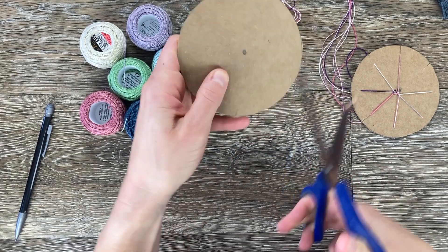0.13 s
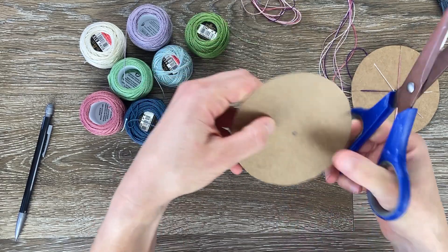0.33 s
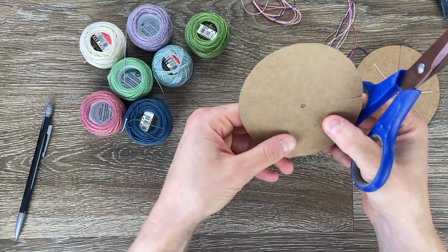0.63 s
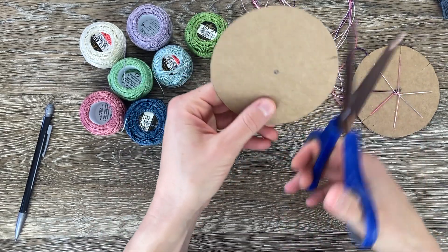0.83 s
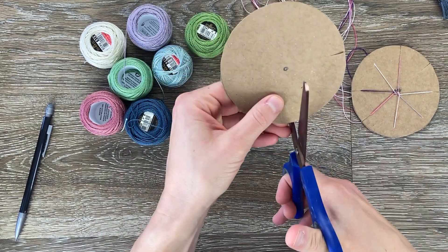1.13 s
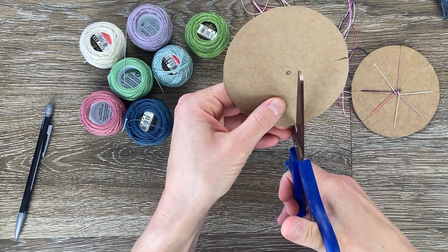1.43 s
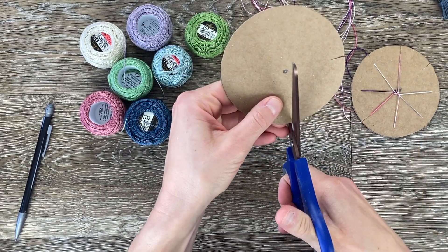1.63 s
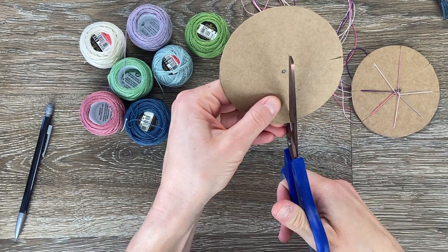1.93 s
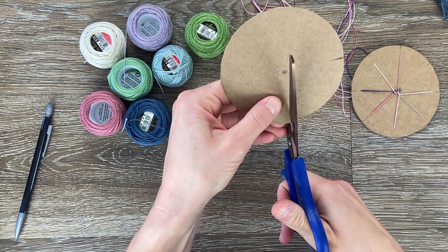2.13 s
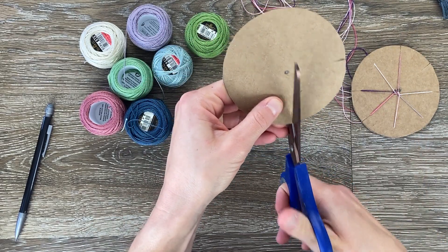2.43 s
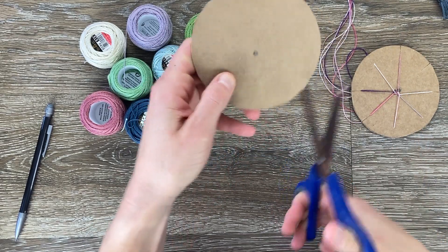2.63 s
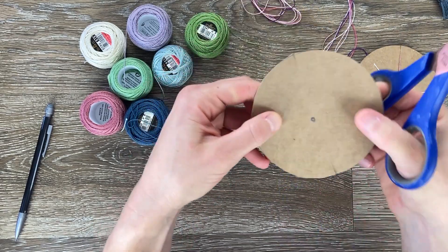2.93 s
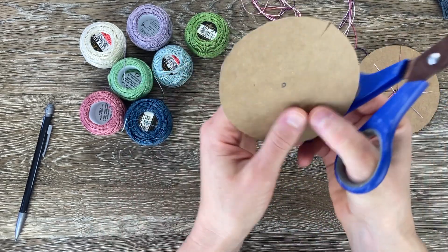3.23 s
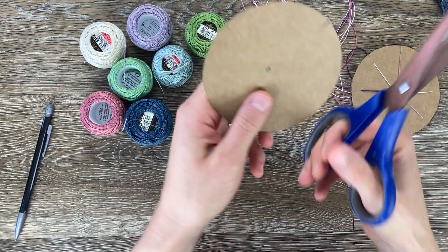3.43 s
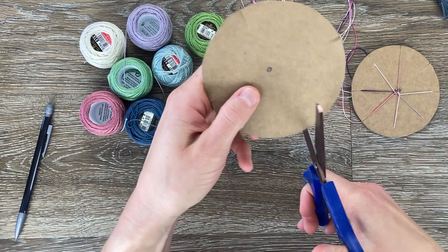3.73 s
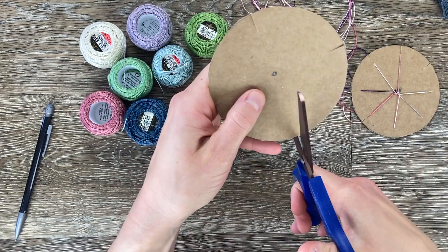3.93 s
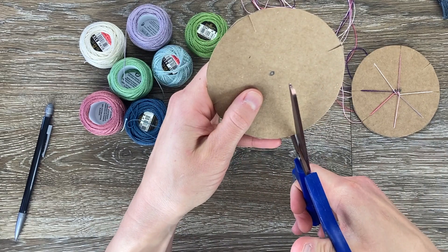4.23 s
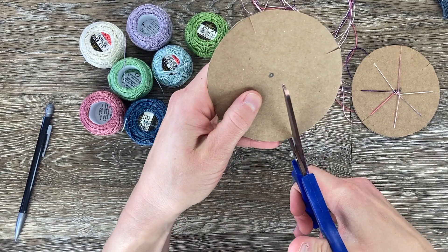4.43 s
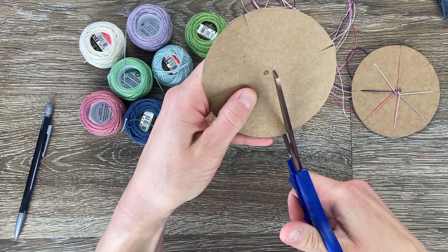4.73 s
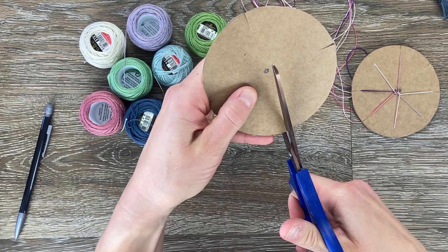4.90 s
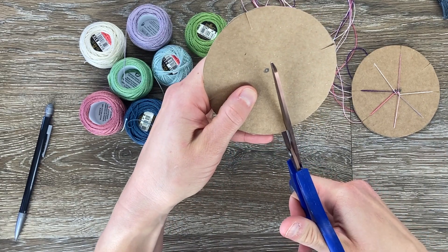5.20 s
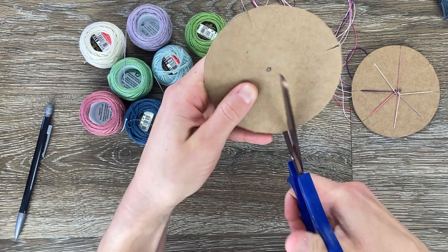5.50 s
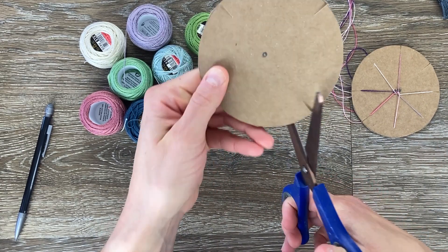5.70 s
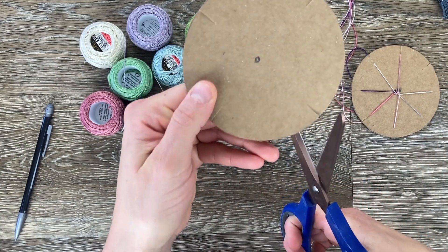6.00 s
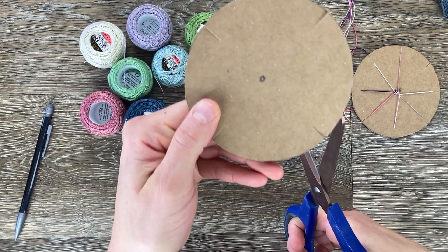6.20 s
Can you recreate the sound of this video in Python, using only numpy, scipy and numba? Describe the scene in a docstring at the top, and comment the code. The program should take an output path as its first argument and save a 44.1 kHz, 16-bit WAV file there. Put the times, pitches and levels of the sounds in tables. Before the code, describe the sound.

Fingers tap and rub a small cardboard disc close to the microphone. Scissors then crunch slowly through the card in uneven little bursts. More taps and dry scrapes follow as the disc is turned, then comes a second slow cut and a last, louder cluster of handling. The small room is quiet, with a faint hum and far-off traffic.

```python
"""Scissors make two slow cuts into a small cardboard disc, close by, over a wooden table.
By stick and slip the fibres tear in bursts, which excite the resonances of blades and card.
Between cuts, fingers and blades slide over the disc and tap it, and the table top rings faintly.
Behind this a small room hums, traffic murmurs far off, and slow air pressure rocks the microphone."""
import sys
import numpy as np
from scipy import signal
from scipy.fft import rfft, irfft, next_fast_len
from scipy.io import wavfile
from scipy.ndimage import uniform_filter1d
from numba import njit

SR = 44100
rng = np.random.default_rng(int(sys.argv[2]) if len(sys.argv) > 2 else 0)


def wav_out(sig):
    """Save sig, one row per channel (or a flat mono array), as 16-bit PCM at SR to the path in sys.argv[1]."""
    wavfile.write(sys.argv[1], SR, np.round(np.clip(np.atleast_2d(sig).T, -1, 1) * 32767).astype(np.int16))


N = 280299

# Steady tearing, one table for each cut: time_s, level_db
CUTS = [
    [(1.58, -93), (1.586, -77), (1.7, -55.5), (1.83, -58.5), (2.068, -58), (2.106, -66), (2.27, -68.5),
     (2.314, -56), (2.42, -89)],
    [(4.52, -75), (4.63, -53.5), (4.7, -57), (4.882, -69), (4.93, -58.5), (4.976, -72), (5.25, -71.5),
     (5.266, -55), (5.33, -85), (5.44, -100)],
]
# Lumps of fibre giving way: start_s, level_db
SLIPS = [(1.749, -55), (1.813, -61), (1.843, -50.5), (1.894, -56), (2.022, -54), (2.047, -60), (2.114, -59),
         (2.139, -54), (2.163, -52), (2.184, -47.5), (2.278, -50), (2.306, -49), (2.3225, -49),
         (2.348, -53), (2.372, -57), (4.574, -57), (4.6114, -56), (4.661, -51.5), (4.7244, -51),
         (4.778, -56.5), (4.8003, -52), (4.819, -53), (4.866, -54), (4.8937, -52), (4.9294, -64.5),
         (4.983, -52.5), (5.051, -60), (5.0913, -50.5), (5.12, -56), (5.133, -53), (5.1612, -68),
         (5.212, -54.5), (5.2632, -51), (5.292, -53), (5.3344, -51.5), (5.384, -53.5)]
# Modes of the blades gripping the card, with mid-cut gain and its change as the bite moves to the tips:
# pitch_hz, width_hz, first_gain_db, first_change_db, second_gain_db, second_change_db
BLADE_MODES = [(460, 23, -27, 3, -2, -21), (614, 138, -6, -3, -5.5, -1), (1148, 85, -5, -1.5, -8.5, 4),
               (1494, 205, -8, -9, -8, -2), (1786, 165, -3, 9, -5, 0), (2090, 236, -8.5, 1, -2, -1),
               (2330, 204, 1.5, 1.5, -3, 3), (2595, 190, -2, 7, -4, -6), (2910, 470, -14, -13, -5.5, -3),
               (3440, 250, -9.5, 3, -8.5, -2), (4280, 410, -10, -4, -6, -1.5),
               (5020, 460, -12.5, -3, -9.5, -1), (5990, 560, -7, -6, -9, 0),
               (6590, 540, -7.5, 3.5, -8.5, 3), (7120, 710, -14.5, 2, -15.5, -1),
               (8550, 700, -15.5, 5, -14.5, 4), (9450, 940, -17.5, -4, -18, 4),
               (11300, 1800, -23.5, 10, -25, 3), (13400, 2500, -21.5, 3, -20, 0),
               (15000, 1900, -28, -4, -22, 4)]
# Rise of the low modes through a cut, one value for each cut: rise_fraction
MODE_RISE = [0.094, 0.029]
# Strokes of skin and steel on the disc; flex, hiss, sheen and scrape are relative to the level:
# start_s, swell_s, hold_s, fade_s, level_db, flex_db, hiss_db, sheen_db, scrape_db, scrape_hz
SLIDES = [(0.0, .004, 0.0095, 0.037, -61, 6, -7, -15, 1.5, 4460),
          (0.03, 0.027, .11, .06, -70, 1, -18, -22, -3.5, 4700),
          (0.185, 0.021, 0.019, 0.028, -62, 0.5, -14, -22, -6, 4500),
          (0.21, 0.057, 0.11, 0.13, -66.5, -4, -12.5, -16, -5, 4700),
          (0.43, 0.0058, .004, 0.034, -62, 1.5, -8, -14, -13, 4220),
          (0.44, .01, 0.091, .08, -87, 20, -20, -22, -22, 4370),
          (0.66, 0.0045, 0.0093, 0.033, -69, 14.5, -18, -28, -13, 4020),
          (0.68, 0.034, .015, 0.027, -68, -9, -5.5, -4, -1.5, 4300),
          (0.764, 0.0053, .04, 0.15, -72.5, 3.5, -10, -14, -15, 4700),
          (1.066, 0.01, .002, .017, -68, -15, -5, -14, -5, 4590),
          (1.09, 0.038, 0.0055, 0.072, -71.5, 12.5, -14, -18, -3, 3940),
          (2.445, 0.012, 0.051, 0.025, -58.5, 1.5, -13.5, -12, -3, 4540),
          (2.516, 0.003, .005, 0.082, -58, 8, -9.5, -15, -1.5, 4450),
          (2.58, 0.077, .002, 0.044, -58.5, -12, -12, -16, 0.5, 4800),
          (2.69, 0.078, 0.0023, .008, -60, -1, -13, -21, -1, 4670),
          (2.91, 0.079, 0.0054, .02, -64, 2.5, -16, -19, -5, 4600),
          (3.004, 0.0077, .002, 0.054, -56, 2.5, -7, -11, -2, 4690),
          (3.05, 0.036, 0.057, .025, -70.5, -7, -14, -9, -6, 4570),
          (3.25, 0.0047, .002, 0.014, -55, 5, -7, -20, -7, 4250),
          (3.256, 0.0057, 0.025, 0.11, -61.5, -9, 0, 0.5, 2, 4300),
          (3.29, 0.06, 0.034, 0.036, -59, -5, -14, -13, -5, 4200),
          (3.388, 0.0068, .002, 0.038, -57.5, 9.5, -17, -23, -0.5, 4030),
          (3.425, .03, 0.031, 0.15, -59, -4, -11, -9, -2, 4270),
          (3.673, 0.0058, .002, 0.076, -49, -4, -15.5, -19, -4, 4180),
          (3.77, .022, .002, 0.06, -70, 1, -14, -14, -8, 4500),
          (3.929, 0.0053, .002, 0.044, -60, 7, -29, -33, -11, 4200),
          (5.497, 0.019, .003, 0.064, -53.5, 5.5, -20, -19, -3.5, 4360),
          (5.53, 0.027, 0.033, 0.03, -57.5, -8, -16, -17, 1, 4430),
          (5.59, 0.033, 0.076, .015, -59.5, -12, -6, -5, -0.5, 4380),
          (5.704, .006, .002, 0.088, -54, -2.5, -20, -14, -12, 4600),
          (5.751, 0.0048, .001, 0.017, -45.5, 11, -27, -24, -11, 5300),
          (5.758, .006, .002, 0.11, -55, 3, -17, -22, -13, 5230),
          (5.825, 0.011, 0.019, 0.028, -53.5, -2, -18, -18, -14, 4400),
          (5.85, .018, 0.028, 0.017, -40, -3.5, -23, -17, -9, 4020),
          (5.895, 0.0062, .004, 0.095, -56.5, 1.5, -12, -21, -4.5, 4360)]
# Taps on the disc, whose grip sets what rings; body and table are relative to the level:
# start_s, level_db, body_db, body_hz, face_hz, table_db
TAPS = [(0.0133, -38, 1, 540, 1500, -3), (0.183, -51, -18, 250, 2630, -22),
        (0.212, -49, -9, 249, 3260, -27), (0.395, -46.5, 8.5, 600, 2560, -1),
        (0.4351, -35, -6.5, 622, 2360, -42), (0.6667, -48, -7, 396, 2540, -13),
        (0.6714, -49.5, 4.5, 386, 4070, -19), (0.6802, -53, -12, 487, 1510, -5),
        (0.7734, -56.5, -12, 345, 2400, -20), (1.108, -57.5, 7, 275, 1820, -17),
        (2.46, -45, -18, 288, 1520, -23), (2.5255, -36.5, 3.5, 866, 1300, -18),
        (2.949, -48, -16, 269, 2550, -9), (2.9678, -45.5, 6.5, 342, 1640, -17),
        (2.9954, -37, -8.5, 600, 3080, -24), (3.0117, -33, -10, 484, 2900, -13),
        (3.255, -33.5, -31, 347, 3080, -31), (3.2837, -44, 5.5, 345, 1680, -13),
        (3.298, -33, -7.5, 308, 1890, -33), (3.328, -52, 6, 266, 4150, -26),
        (3.3959, -37, -11, 813, 2900, -29), (3.4574, -49, 7.5, 357, 3200, -25),
        (3.6548, -50.5, 1, 622, 2580, -22), (3.679, -39.5, -10, 291, 2540, -5),
        (3.7933, -49, -6, 250, 2470, -21), (3.934, -39.5, -18, 388, 2820, -35),
        (4.0799, -54, 4, 250, 2100, -11), (4.3898, -63.5, 9.5, 404, 1610, 0),
        (5.7094, -38, -2.5, 386, 1930, -11), (5.753, -28, -3.5, 720, 1670, -12),
        (5.7602, -42, 7, 463, 2090, -8), (5.8363, -34, -21, 476, 2550, -13)]
# Modes of the disc, from slow bending to the finest sheen: pitch_hz, width_hz, gain_db
BODY_MODES = [(156, 39, -6.5), (342, 89, -5.5), (467, 76, -3), (657, 217, -2.5), (994, 228, -4.5),
              (1187, 330, -6.5)]
FACE_MODES = [(1557, 190, 2.5), (1775, 270, 4), (2615, 526, 6), (2796, 206, 7), (3420, 1120, -2.5),
              (4660, 740, 2), (4990, 490, 0), (6030, 900, -4), (6640, 770, -7.5)]
EDGE_MODES = [(7400, 1340, -2), (10500, 3200, -4)]
SHEEN_MODES = [(12560, 2100, 0), (15000, 1100, 0)]
# Background levels: time_s, hiss_db, hum_db, air_db
BACKGROUND_LEVELS = [(0.0, -71.5, -74.5, -43.5), (0.65, -70.5, -70.5, -51.5), (0.94, -68.5, -68.5, -41.5),
                     (1.5, -67, -67.5, -44), (1.9, -63, -65.5, -41), (2.3, -65, -65.5, -43.5),
                     (2.9, -64, -66.5, -39.5), (3.5, -65.5, -66.5, -37), (4.6, -66.5, -65, -42),
                     (5.4, -64.5, -65.5, -42.5), (5.52, -67.5, -68.5, -41), (5.75, -61.5, -59, -43.5),
                     (5.92, -64.5, -64, -40), (6.1, -65.5, -68, -42.5), (6.36, -66.5, -71, -33)]
# Level of the distant traffic: time_s, level_db
TRAFFIC_LEVELS = [(0.0, -79), (0.67, -69), (1.02, -71.5), (1.13, -88), (1.4, -82), (1.88, -66.5),
                  (2.07, -78), (2.27, -72.5), (2.67, -62.5), (3.06, -81.5), (3.54, -59), (3.73, -69),
                  (3.95, -67.5), (4.16, -81.5), (4.7, -70.5), (4.94, -73), (5.74, -72.5), (6.02, -95),
                  (6.36, -64.5)]
# Resonances of the building's hum and of the walls: pitch_hz, width_hz, gain_db
HUM_MODES = [(118.5, 13, -2.5), (149.3, 9.5, -0.5), (160.7, 14, 1), (194, 17.3, -1.5)]
WALL_MODES = [(394, 56, 7), (492.6, 24, 6.5), (590, 160, -7), (779, 128, -1), (873, 113, 1.5)]
# Spectra of the room's hiss and of the air pressure: frequency_hz, relative_density_db
HISS_SPECTRUM = [(26, -28), (45, 2.5), (55, -4.5), (81, -5.5), (173, -9), (227, -12), (263, -11),
                 (297, -11), (353, -17.5), (685, -24), (737, -25), (1740, -27.5), (1920, -28.5),
                 (3130, -30), (15800, -35)]
AIR_SPECTRUM = [(1.8, -46), (3.0, 6), (18, 1), (35, -21.5), (60, -25), (78, -69), (130, -120)]


def cutting():
    """Stick and slip: fibres tear unevenly and snap in lumps, driving the modes of the gripped blades."""
    start_s, level_db = np.transpose(SLIPS)
    tearing = gate(CUTS) * undb(curve(CUTS, column=1) + 2.66 * walk(90))
    snaps = bursts(start_s, level_db, rise_s=0.0011, decay_s=0.0079)
    force = fibres(9000, spread_db=1.95) * (tearing + snaps)
    out = np.zeros(N)
    for k, cut in enumerate(CUTS):
        span = slice(int(cut[0][0] * SR), int(cut[-1][0] * SR))
        travel = np.linspace(-.5, .5, span.stop - span.start)
        modes = []
        for hz, width_hz, *gains in BLADE_MODES:
            gain_db, change_db = gains[2 * k:2 * k + 2]
            # the free length of blade shortens, so the low modes climb
            glide = 1 + MODE_RISE[k] * travel * (hz < 2900)
            grip_db = 2.1 * walk(25.13, size=len(travel))
            modes.append((hz * glide, width_hz, gain_db + change_db * travel + grip_db))
        out[span] = resonate(force[span], modes)
    return out


def sliding(swell_db=20):
    """Friction: each stroke swells, holds and fades, its tiny impacts exciting card and steel."""
    t, envelopes = np.arange(N) / SR, np.zeros((5, N))
    for start_s, swell_s, hold_s, fade_s, level_db, *layers_db, _ in SLIDES:
        top_s = start_s + swell_s
        span = slice(int(start_s * SR), int((top_s + hold_s + 2 * fade_s) * SR))
        before = (top_s - t[span]) / swell_s
        after = (t[span] - top_s - hold_s) / fade_s
        drop_db = swell_db * np.maximum(0, np.maximum(before, after))
        envelopes[:, span] += np.outer(undb([0, *layers_db]), undb(level_db - drop_db))
    friction = fibres(12000, spread_db=2.9) * undb(1.27 * walk(60))
    face, flex, hiss, sheen, scrape = friction * envelopes
    scrape_hz = curve([SLIDES], column=9)
    steel = resonate(scrape, [(scrape_hz, 450, 0), (0.672 * scrape_hz, 300, -2)])
    return disc(face, flex, hiss, sheen) + steel


def tapping(rattle_s=0.0032):
    """Impact excitation: a sharp push and a short rattle leave disc and table in damped vibration."""
    start_s, level_db, body_db, body_hz, face_hz, table_db = np.transpose(TAPS)
    rattle = fibres(14000, spread_db=1.8)
    face = rattle * bursts(start_s, level_db - 7.5, rise_s=0.00027, decay_s=rattle_s)
    face += impulses(start_s, level_db + 4.5)
    # the whole disc bends more slowly than its face
    flex = rattle * bursts(start_s, level_db + body_db - 7.5, rise_s=0.0012, decay_s=1.86 * rattle_s)
    crack = rattle * bursts(start_s, level_db - 21, rise_s=0.00018, decay_s=0.31 * rattle_s)
    crack += impulses(start_s, level_db - 12)
    face_ring = knocks(start_s, level_db - 7, face_hz, decay_s=0.0024)
    body_ring = knocks(start_s, level_db + body_db - 1.5, body_hz, decay_s=0.0033)
    table_ring = knocks(start_s, level_db + table_db - 12, pitch_hz=473.2, decay_s=0.058)
    return disc(face, flex, crack, crack) + face_ring + body_ring + table_ring


def disc(face, flex, edge, sheen):
    """Modal response: four forces each drive their own group of the disc's modes."""
    low = resonate(face, FACE_MODES) + resonate(flex, BODY_MODES)
    return low + resonate(edge, EDGE_MODES) + resonate(sheen, SHEEN_MODES)


def reverberation(x, t60_s=0.21, gain_db=-17, cutoff_hz=3200, onset_s=0.023):
    """Diffuse reflection: a small furnished room returns a dull, exponentially decaying tail."""
    t = np.arange(int(.6 * SR)) / SR
    envelope = np.exp(-np.log(1000) * t / t60_s) * np.minimum(t / onset_s, 1)
    tail = signal.lfilter(*signal.butter(1, cutoff_hz, fs=SR), rng.standard_normal(len(t)) * envelope)
    return undb(gain_db) * signal.fftconvolve(x, tail / np.linalg.norm(tail))[:N]


def traffic():
    """Transmission through walls: distant traffic noise is coloured by their resonances."""
    return resonate(rng.standard_normal(N), WALL_MODES) * undb(curve([TRAFFIC_LEVELS], column=1))


def room_noise():
    """Filtered noise: broadband hiss, the building's narrow-band hum and mostly infrasonic air pressure."""
    hiss_db, hum_db, air_db = (curve([BACKGROUND_LEVELS], column) for column in (1, 2, 3))
    hiss = coloured(HISS_SPECTRUM) * undb(hiss_db + .5 * walk(5.4))
    hum = resonate(rng.standard_normal(N), HUM_MODES) * undb(hum_db + 0.51 * walk(2.89))
    return hiss + hum + coloured(AIR_SPECTRUM) * undb(air_db)


def fibres(rate_hz, spread_db):
    """Shot noise of rms 1: tiny breaks at random moments, a few much larger than the rest."""
    breaks = (rng.random(N) < rate_hz / SR) * rng.standard_normal(N)
    size_db = spread_db * np.minimum(rng.exponential(size=N), 4.5)
    return unit_rms(breaks * undb(size_db))


def bursts(start_s, level_db, rise_s, decay_s):
    """Relaxation: an envelope that rises at each start and decays exponentially."""
    envelope = np.zeros(N)
    for start, gain in zip((start_s * SR).astype(int), undb(level_db)):
        t = np.arange(min(int(8 * decay_s * SR), N - start)) / SR
        envelope[start:][:len(t)] += gain * np.minimum(t / rise_s, 1) * np.exp(-t / decay_s)
    return envelope


def knocks(start_s, level_db, pitch_hz, decay_s):
    """Free vibration: each blow starts a damped sinusoid."""
    out, t = np.zeros(N + SR), np.arange(int(min(8 * decay_s, 1) * SR)) / SR
    for start, gain, hz in np.broadcast(start_s, undb(level_db), pitch_hz):
        out[int(start * SR):][:len(t)] -= gain * np.sin(2 * np.pi * hz * t) * np.exp(-t / decay_s)
    return out[:N]


def impulses(start_s, level_db):
    """Impulsive force: a one-sample push at each start."""
    out = np.zeros(N)
    out[(start_s * SR).astype(int)] = -undb(level_db)
    return out


def resonate(x, modes):
    """Modal superposition: fixed or gliding resonances, scaled so white noise roughly keeps its rms."""
    x = x + 1e-12 * np.cos(np.arange(len(x)))  # avoids slow arithmetic in silent tails
    out, power = np.zeros(len(x)), 0
    for k, (hz, width_hz, gain_db) in enumerate(modes):
        tuning = np.tan(np.pi * hz / SR) * np.ones(len(x))
        out += (-1) ** k * undb(gain_db) * resonator(x, tuning, width_hz / np.mean(hz))
        power += np.mean(undb(gain_db)) ** 2 * np.pi * width_hz / SR
    return out / np.sqrt(power)


@njit
def resonator(x, tuning, damping):
    """Driven oscillator: a state-variable band-pass with gain 1 at its movable centre."""
    out, band_state, low_state = np.empty(len(x)), 0., 0.
    for i in range(len(x)):
        band = (band_state + tuning[i] * (x[i] - low_state)) / (1 + tuning[i] * (tuning[i] + damping))
        band_state = 2 * band - band_state
        low_state += 2 * tuning[i] * band
        out[i] = damping * band
    return out


def coloured(spectrum):
    """Spectral shaping: white noise weighted by the given spectrum, at rms 1."""
    hz, db = np.transpose(spectrum)
    size = next_fast_len(N)
    bins_hz = (np.arange(size // 2 + 1) + 1e-3) * SR / size
    gain = undb(np.interp(np.log(bins_hz), np.log(hz), db))
    return unit_rms(irfft(rfft(rng.standard_normal(size)) * gain, size)[:N])


def walk(rate_hz, size=N):
    """Random modulation: smoothed steps of rms 1."""
    hold = int(SR / rate_hz)
    steps = np.repeat(rng.standard_normal(size // hold + 1), hold)
    return unit_rms(uniform_filter1d(steps, hold // 2)[:size])


def curve(tables, column):
    """Linear interpolation of one column over time, through all the tables."""
    rows = np.vstack(tables)
    return np.interp(np.arange(N) / SR, rows[:, 0], rows[:, column])


def gate(tables, fade_s=0.0089):
    """Time window: 1 during each table, fading to 0 just outside it."""
    t = np.arange(N) / SR
    depths_s = [np.minimum(t - rows[0][0], rows[-1][0] - t) for rows in tables]
    return np.minimum(1, sum(np.clip(1 + depth / fade_s, 0, 1) for depth in depths_s))


def undb(db):
    return 10 ** (np.asarray(db) / 20)


def unit_rms(x):
    return x / np.sqrt(np.mean(x ** 2))


def scene():
    """Superposition: direct sound, its reflections and the background add in one channel."""
    direct = cutting() + sliding() + tapping()
    return (direct + reverberation(direct) + traffic() + room_noise())[None]


def record(dry):
    """Band limiting: a steep low-pass removes the highest treble."""
    cutoff_hz = 15850
    return signal.sosfilt(signal.ellip(10, .2, 60, cutoff_hz, fs=SR, output="sos"), dry)


dry = scene()
out = record(dry)
wav_out(out)
```